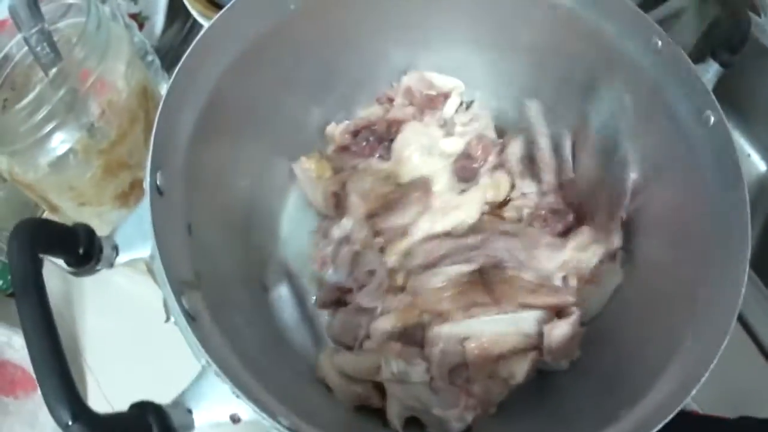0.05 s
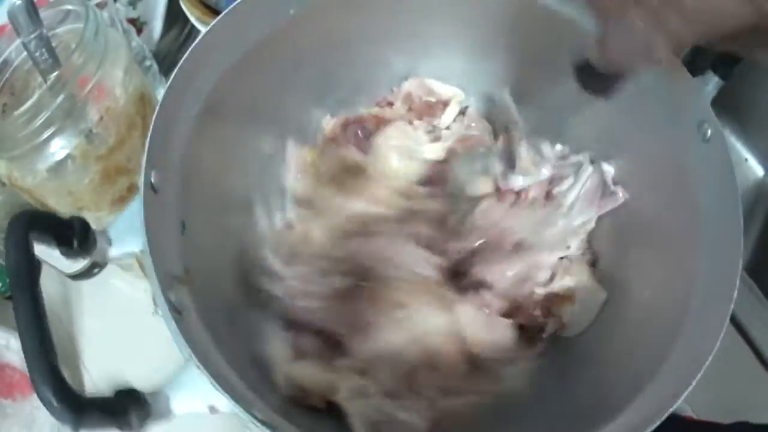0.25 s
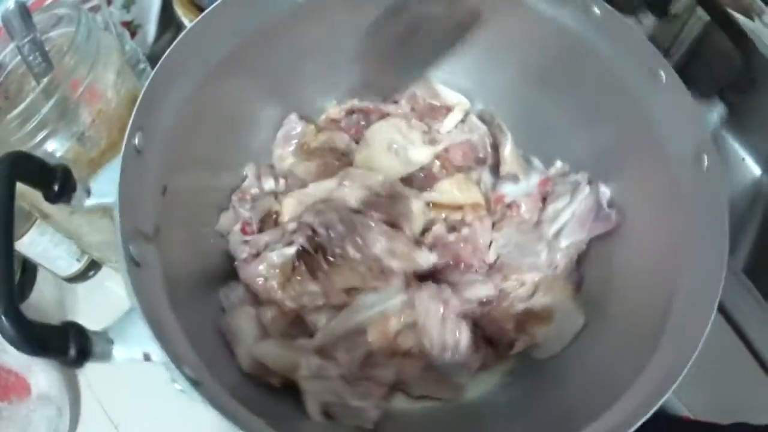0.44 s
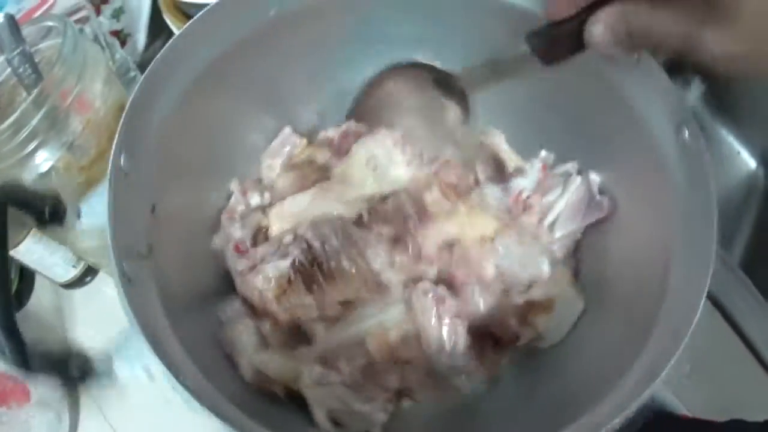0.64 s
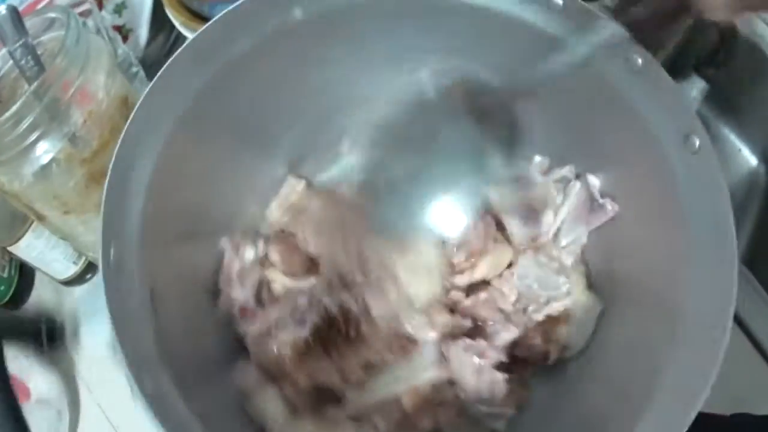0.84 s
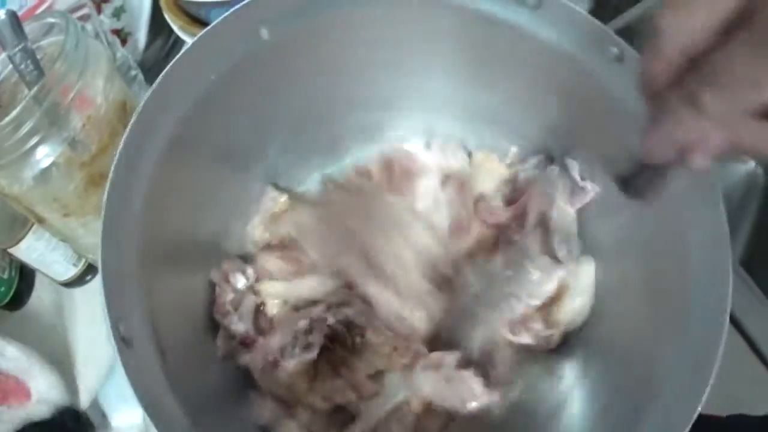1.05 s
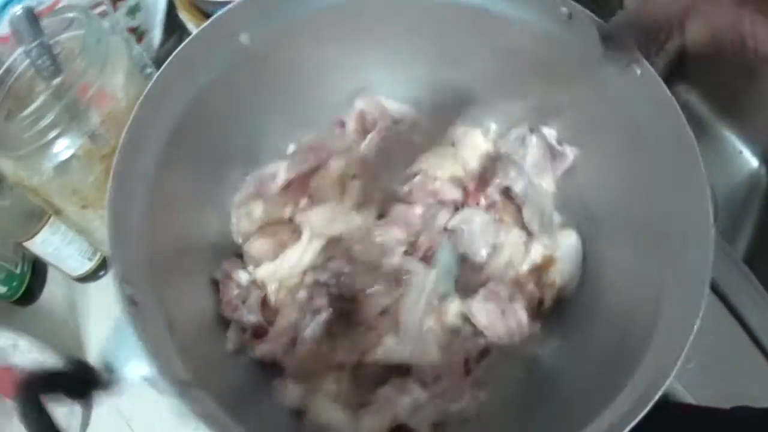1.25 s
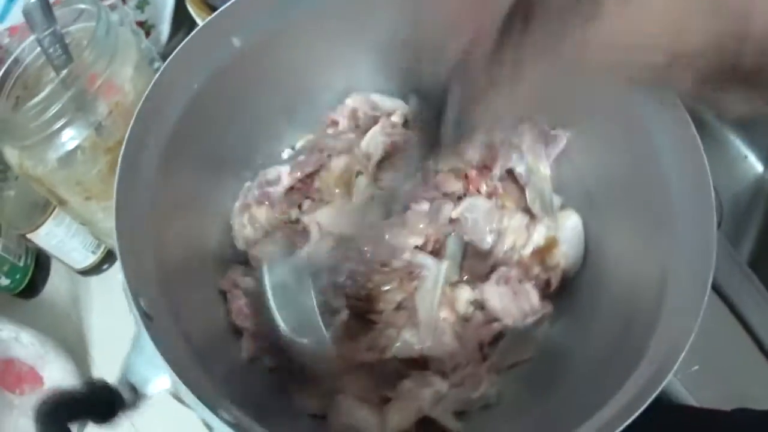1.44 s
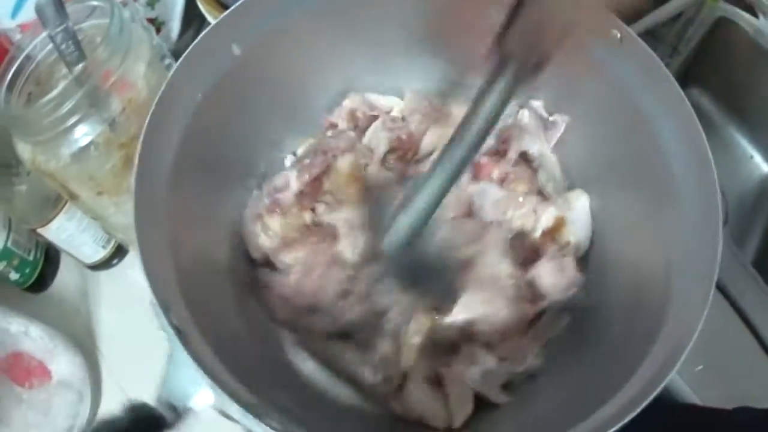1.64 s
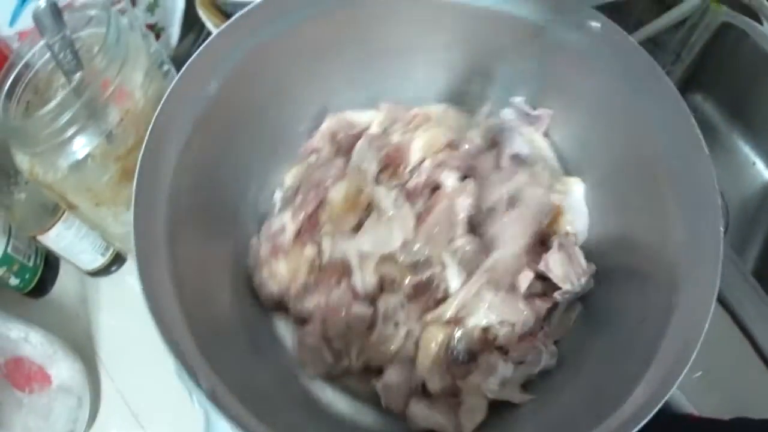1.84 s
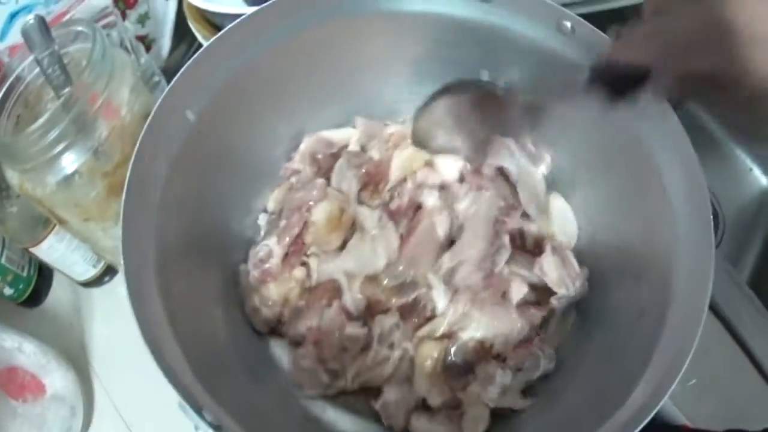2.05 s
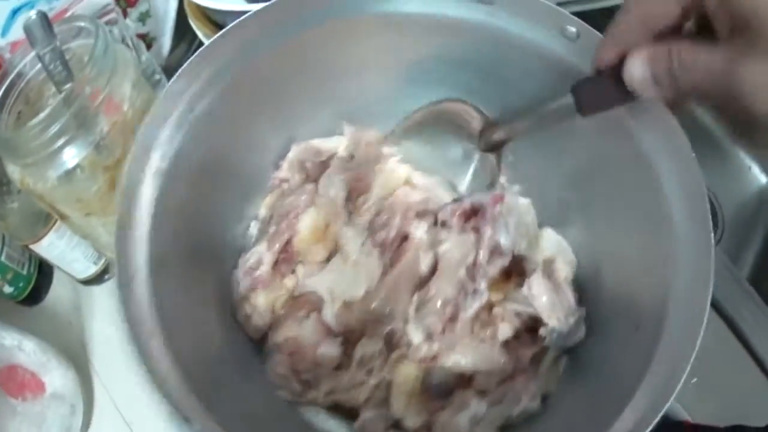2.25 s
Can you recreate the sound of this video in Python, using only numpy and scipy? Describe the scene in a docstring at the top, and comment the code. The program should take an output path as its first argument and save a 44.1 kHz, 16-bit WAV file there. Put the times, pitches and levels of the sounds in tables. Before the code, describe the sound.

Close up in a kitchen, a metal spoon scrapes around a thin metal pot of wet meat pieces. It clangs briefly, the pot knocks on the counter, then another ringing scrape follows, with small sticky ticks throughout.

```python
"""A metal spoon stirs raw meat in a wide thin metal pot in a kitchen. Its blows excite the damped modes
of the wall, and stick-slip friction drives the wall as it scrapes along. The spoon rings briefly in
modes of its own; the pot rocks and knocks on the counter; wet pieces tick and crackle as they part.
The room adds a short reverberation and hums faintly."""
import sys
import numpy as np
from scipy import signal
from scipy.fft import rfft, irfft
from scipy.io import wavfile

SR = 44100
rng = np.random.default_rng(int(sys.argv[2]) if len(sys.argv) > 2 else 0)


def unload_wav(signal):
    """Save mono or channel-first audio to the path in sys.argv[1] as 16-bit WAV at rate SR, clipped to [-1, 1]."""
    wavfile.write(
        sys.argv[1],
        SR,
        np.round(np.clip(np.atleast_2d(signal).T, -1, 1) * 32767).astype(np.int16),
    )


N = 101429

def from_db(db):
    """Amplitude ratio of a level in decibels."""
    return 10 ** (np.asarray(db) / 20)

def unit_rms(x):
    """Normalisation to unit mean power."""
    return x / np.sqrt(np.mean(x ** 2) + 1e-20)

def level_at(spectrum, hz):
    """Interpolation of (pitch_hz, level_db) points over log frequency."""
    pitch_hz, level_db = np.transpose(spectrum)
    return np.interp(np.log(hz), np.log(pitch_hz), level_db)

def add(out, start_s, sound):
    """Superposition of a sound from start_s on."""
    i = int(start_s * SR)
    out[i:i + len(sound)] += sound[:N - i]

def drift(corner_hz):
    """Random modulation: low-passed noise of unit rms."""
    r = np.exp(-2 * np.pi * corner_hz / SR)
    return unit_rms(signal.lfilter([1], [1, -2 * r, r * r], rng.standard_normal(N + SR))[SR:])

def decay(t60_s, t):
    """Exponential damping: 60 dB in t60_s, taken as at least 1 ms."""
    return from_db(-60 * t / np.maximum(t60_s, 1e-3))

def soft_onset(sound, rise_s=.0003):
    """A compliant contact builds up gradually instead of clicking."""
    return sound * (1 - np.exp(-np.arange(len(sound)) / SR / rise_s))

def struck_modes(hz, level_db, t60_s, spread_db=2):
    """Modal impact response: damped sines of scattered strength, neighbours in opposite phase."""
    t = np.arange(SR // 2)[:, None] / SR
    amplitude = from_db(level_db + rng.normal(0, spread_db, len(hz)))
    partials = amplitude * decay(t60_s, t) * np.sin(2 * np.pi * hz * t)
    return soft_onset((partials * (-1) ** np.arange(len(hz))).sum(axis=1))

def resonator(drive, hz, radius):
    """Two-pole resonance: each impulse starts a sine that shrinks by radius every sample."""
    w = 2 * np.pi * hz / SR
    return signal.lfilter([0, np.sin(w)], [1, -2 * radius * np.cos(w), radius ** 2], drive + 1e-18)

def coloured_noise(spectrum, count):
    """Spectral shaping of white noise, at unit rms."""
    hz = np.maximum(np.fft.rfftfreq(count, 1 / SR), 1)
    return unit_rms(irfft(rfft(rng.standard_normal(count)) * from_db(level_at(spectrum, hz)), count))

# Spectrum of the room's hum: pitch_hz, level_db
HUM_SPECTRUM = [(20, -2.5), (60, 7.5), (400, 2), (1100, -6), (3200, -16), (9000, -12.5)]
def hum(level_db=-50.5):
    """Stationary background noise, strongest at low frequencies."""
    return from_db(level_db) * coloured_noise(HUM_SPECTRUM, N + N % 2)[:N]

def reverberation(x, level_db=-27.5, t60_s=0.4, absorption_hz=8800):
    """Repeated reflection: eight feedback delays lose treble to absorption on every round trip."""
    out, pole = np.zeros(N), np.exp(-2 * np.pi * absorption_hz / SR)
    for k, lag in enumerate((rng.uniform(.012, .035, 8) * SR).astype(int)):
        loop, gain, state = x.copy(), decay(t60_s, lag / SR), [0.]
        for i in range(lag, N, lag):
            echo, state = signal.lfilter([gain * (1 - pole)], [1, -pole], loop[i - lag:i], zi=state)
            loop[i:i + lag] += echo[:N - i]
        out += (loop - x) * (-1) ** k
    return from_db(level_db) * out

# Partings of wet pieces: start_s, level_db, pitch_hz
WET_TICKS = [(0.1025, -25.5, 2430), (0.1159, -21.5, 4070), (0.1372, -22.5, 3020), (0.156, -24, 7500),
             (0.1787, -17.5, 4500), (0.2274, -15, 4990), (1.065, -8, 6200), (1.5136, -22, 5740),
             (1.866, -25, 5340), (1.877, -24, 7740), (2.149, -22.5, 4700), (2.2715, -24, 9120)]
def wet_ticks(t60_cycles=36):
    """Sudden release of adhesion: a short damped ring in a bright spit of noise."""
    out, t = np.zeros(N), np.arange(2048) / SR
    for start_s, level_db, hz in WET_TICKS:
        spit = coloured_noise([(hz / 4, -30), (hz, -1), (hz * 3, -8)], len(t))
        envelope = from_db(level_db) * decay(t60_cycles / hz, t)
        add(out, start_s, soft_onset(envelope * (np.sin(2 * np.pi * hz * t) + spit)))
    return out

def crackle(stroke, rate_per_s=150, gain_db=-1.5, t60_cycles=9.7):
    """A Poisson process: sticky pieces part at random in tiny treble rings that scale with the stroke."""
    partings = rng.random(N) < rate_per_s / SR
    impulses = partings * from_db(3.7 * np.minimum(rng.exponential(1, N), 4)) * stroke
    pitch_index, out = rng.integers(0, 14, N), np.zeros(N)
    for k, hz in enumerate(np.geomspace(2000, 10000, 14)):
        out += resonator(impulses * (pitch_index == k), hz, decay(t60_cycles / hz, 1 / SR))
    return from_db(gain_db) * out

# Knocks of pot, counter and spoon: start_s, level_db, pitch_hz, t60_s
DAMPED_KNOCKS = [(0.0788, -17.5, 1500, 0.039), (0.0785, -17, 2800, 0.011), (.979, -22.5, 630, 0.052),
                 (.984, -18, 267, 0.028), (0.994, -8, 1700, 0.022), (0.994, -11.5, 630, 0.028),
                 (0.983, -25.5, 82, 0.11), (1.037, -22, 1700, 0.016), (1.0765, -11.5, 4000, 0.0089),
                 (1.146, -35.5, 82, 0.084), (1.0605, -11, 180, 0.034), (1.141, -20.5, 465, 0.062),
                 (1.1945, -14.5, 709, 0.058), (1.2523, -9.5, 468, 0.056), (1.2519, -13.5, 1400, 0.027),
                 (0.5595, -13.5, 2390, 0.059), (1.694, -24, 3980, 0.032), (1.272, -19, 1390, 0.019),
                 (1.2755, -13, 990, 0.03), (1.284, -13.5, 1000, 0.029), (1.289, -11, 3610, 0.01),
                 (1.2987, -9, 1200, 0.013), (1.2995, -17.5, 421.7, 0.17), (1.4717, -13.5, 1328, 0.023),
                 (2.129, -39.5, 523, 0.27), (1.289, -20, 9700, 0.032)]
def knocks(puff_db=-6, half_width_oct=0.58, crack_db=-5.5, crack_t60_s=0.0024):
    """Heavily damped impact: a crack at first contact, then one mode in a puff of noise."""
    out, t, ratio = np.zeros(N), np.arange(8192) / SR, 2 ** half_width_oct
    for start_s, level_db, hz, t60_s in DAMPED_KNOCKS:
        band = [(hz / ratio ** 3, -40), (hz / ratio, -3), (hz * ratio, -3), (hz * ratio ** 3, -30)]
        puff = from_db(puff_db) * coloured_noise(band, len(t))
        body = soft_onset(decay(t60_s, t) * (np.sin(2 * np.pi * hz * t) + puff))
        bright_noise = coloured_noise([(hz / 2, -10), (hz * 2, 0), (hz * 8, -12)], len(t))
        crack = from_db(crack_db) * decay(crack_t60_s, t) * bright_noise
        low_cut = signal.butter(3, hz / 2, "high", fs=SR, output="sos")
        add(out, start_s, from_db(level_db) * signal.sosfilt(low_cut, body + crack))
    return out

# Modes of the spoon, in two groups: pitch_hz, level_db, t60_s
MAIN_SPOON_MODES = [(1580, -5.5, 0.062), (3250, -12, 0.071), (4000, -22, 0.057), (5840, -8, 0.051),
                    (8960, -2, 0.084)]
TOP_SPOON_MODES = [(8010, -26.5, 0.13), (10390, -4.5, 0.082)]
# Touches that ring the spoon: start_s, main_db, top_db
SPOON_CLINKS = [(.042, -60, -32.5), (.058, -50, -34), (0.326, -35, -38), (0.334, -53, -16.5),
                (.344, -48, -20), (1.101, -22, -20), (1.473, -23, -36), (1.688, -56, -22.5),
                (1.919, -50, -17)]
def spoon_clinks(roughness_db=1.5):
    """Natural modes of the spoon, roughened by rubbing; each touch sets its own level for each group of modes."""
    out = np.zeros(N)
    for start_s, main_db, top_db in SPOON_CLINKS:
        for part, level_db in ((MAIN_SPOON_MODES, main_db), (TOP_SPOON_MODES, top_db)):
            hz, mode_db, t60_s = np.transpose(part)
            add(out, start_s, struck_modes(hz, level_db + mode_db, t60_s))
    return out * from_db(roughness_db * drift(corner_hz=180))

# Continuous slide through the meat: time_s, treble_db, lower_relative_db
SPOON_SLIDE = [(0, -53.5, -28), (0.072, -52.5, 9), (.14, -37, -1.5), (.265, -36, -3.5), (.305, -41.5, -5.5),
               (.365, -57, 4), (.462, -52, -1), (.5, -47, -24), (.6, -29.5, -7.5), (.66, -42, 0),
               (.88, -45, -6), (.92, -54.5, -5), (.978, -54, -5), (1.0, -39, 5.5), (1.24, -32.5, -5.5),
               (1.26, -44.5, 17), (1.309, -44, 16), (1.403, -60.5, 10), (1.52, -48, -3.5),
               (1.759, -45, -9.5), (1.8, -57.5, 2), (1.915, -64, 6), (1.99, -28, -4), (2.06, -35, -4.5),
               (2.207, -37.5, -6), (2.25, -52, -1), (2.3, -36, -0.5)]
# Short bites into the wall: start_s, length_s, treble_db, lower_relative_db
WALL_SCRAPES = [(0.174, 0.02, -36, 2), (0.206, 0.013, -34, 3.5), (0.223, 0.01, -26.5, -13),
                (0.322, 0.02, -37.5, -7), (0.48, 0.039, -23, 1), (0.521, 0.025, -18.5, -43),
                (0.548, 0.03, -25, -5.5), (.606, 0.021, -26, -12), (0.705, 0.027, -30, -4),
                (0.981, 0.018, -31.5, 2.5), (1.032, 0.0063, -30, 4.5), (1.0765, 0.028, -19, -14.5),
                (1.16, .015, -27.5, -27), (1.197, 0.032, -31, 8), (1.299, 0.013, -37.5, 15.5),
                (1.679, 0.036, -37, -3.5), (1.919, 0.048, -22.5, -8.5), (1.948, 0.046, -31, -10),
                (2.145, 0.0084, -26.5, -12),]
def stroke_envelopes(rise_s=.0015, release_t60_s=0.02):
    """Incoherent sources add in power: slide and scrapes give a treble and a lower-band amplitude."""
    t = np.arange(N) / SR
    time_s, treble_db, relative_db = np.transpose(SPOON_SLIDE)
    power = from_db([np.interp(t, time_s, db) for db in (treble_db, treble_db + relative_db)]) ** 2
    for start_s, length_s, treble_db, relative_db in WALL_SCRAPES:
        attack = np.clip((t - start_s) / rise_s, 0, 1)
        release = decay(release_t60_s, np.maximum(t - start_s - length_s, 0))
        power += (from_db([[treble_db], [treble_db + relative_db]]) * attack * release) ** 2
    return np.sqrt(power)

# Modes of the pot wall, rubbed here and struck below: pitch_hz, level_db, t60_s
WALL_MODES = [(237.1, -29.5, 0.76), (359.4, -28, 0.69), (508.8, -14, 0.22), (558.6, -7.5, 0.14),
              (655, -14, 0.13), (947.7, -4, 0.36), (1000.5, -6, 0.2), (1446, -17.5, 0.3),
              (1878, -19.5, 0.25), (2700, -21.5, 0.18), (2826, -20.5, 0.17), (3456, -18, 0.088),
              (3850, -21, 0.11), (4145, -26, 0.14), (4400, -27, 0.17), (4564, -28, 0.14), (4825, -23, 0.14),
              (5185, -31.5, 0.33), (5424, -25.5, 0.2), (5720, -28.5, 0.13), (6010, -22.5, 0.066),
              (7180, -26, 0.053)]
# Weighting of the modes under friction: pitch_hz, level_db
FRICTION_SPECTRUM = [(200, -12.5), (505, 2), (732, -7.5), (958, 4.5), (1280, 0.5), (4500, -3), (7500, 1.5),
                     (11200, -7)]
def wall_friction(treble, lower, slips_per_s=6000, spread_db=5, flutter_db=2.17, split_hz=3500):
    """Stick-slip friction: dense uneven impulses drive the wall's many close modes, in twelve groups."""
    slips = (rng.random(N) < slips_per_s / SR) * rng.choice([-1, 1], N)
    size_db = spread_db * np.minimum(rng.exponential(1, N), 4)
    slips = slips * from_db(size_db + flutter_db * drift(corner_hz=104))
    close_hz = np.linspace(300, 11000, 70) * rng.uniform(.98, 1.02, 70)
    pitches = np.concatenate([np.transpose(WALL_MODES)[0], close_hz])
    strong_low = (np.arange(len(pitches)) < len(WALL_MODES)) * (pitches < split_hz)
    gain = from_db(level_at(FRICTION_SPECTRUM, pitches) + 2 * strong_low)  # these stand out by 2 dB
    group, out = rng.integers(0, 12, N), np.zeros(N)
    for k, hz in enumerate(pitches):
        blend = np.clip(.5 + np.log2(hz / split_hz) / 1.4, 0, 1)  # lower to treble over 1.4 octaves
        drive = unit_rms(slips * (group == k % 12)) * treble ** blend * lower ** (1 - blend)
        t60_s = 0.034 * (split_hz / hz) ** 0.61  # higher modes die sooner
        radius = decay(t60_s, 1 / SR)
        band_share = gain[k] / np.linalg.norm(gain[(pitches > split_hz) == (hz > split_hz)])
        unit_power_gain = np.sqrt(2 * (1 - radius ** 2))
        out += band_share * unit_power_gain * resonator(drive, hz, radius)
    return out

# Centres of the deep, clang, middle and high mode groups: pitch_hz
MODE_GROUP_HZ = [480, 970, 2300, 5500]
# Spoon blows on the wall: start_s, deep_db, clang_db, middle_db, high_db, ring_time_ratio
WALL_BLOWS = [(.466, -16, -5, -1, -13.5, 0.5), (.483, -16.5, -10, -42, 6, 0.49),
              (1.076, -14, -19.5, 9, -25, 0.12), (1.194, 0, -47, -3, 6, 0.33),
              (1.9195, -15.5, -12, -12, 6, 1), (1.945, -8, -50, -37, -11, 1),
              (1.968, -47, -18, -12.5, 8, 0.72)]
def wall_blows(roughness_db=1.5):
    """Impact excitation of the wall modes, damped by the meat and roughened by the rubbing spoon."""
    out, (hz, mode_db, t60_s) = np.zeros(N), np.transpose(WALL_MODES)
    for start_s, *groups_db, ring_time_ratio in WALL_BLOWS:
        blow_db = level_at(list(zip(MODE_GROUP_HZ, groups_db)), hz)
        add(out, start_s, struck_modes(hz, blow_db + mode_db, t60_s * ring_time_ratio))
    return out * from_db(roughness_db * drift(corner_hz=90))

def scene(radiation_hz=215):
    """Superposition of pot, reverberation and hum; thin metal radiates little below radiation_hz."""
    treble, lower = stroke_envelopes()
    stirring = wall_blows() + spoon_clinks() + wet_ticks() + wall_friction(treble, lower)
    stirring += crackle(treble)
    low_cut = signal.butter(4, radiation_hz, "high", fs=SR, output="sos")
    direct = signal.sosfilt(low_cut, stirring) + knocks()
    return (direct + reverberation(direct) + hum())[None]

def record(dry, limit=.6, cutoff_hz=11050):
    """Soft saturation rounds the peaks; a steep low-pass limits the bandwidth."""
    low_pass = signal.ellip(12, .5, 70, cutoff_hz, fs=SR, output="sos")
    return signal.sosfilt(low_pass, limit * np.tanh(dry / limit))

dry = scene()
out = record(dry)
unload_wav(out)
```